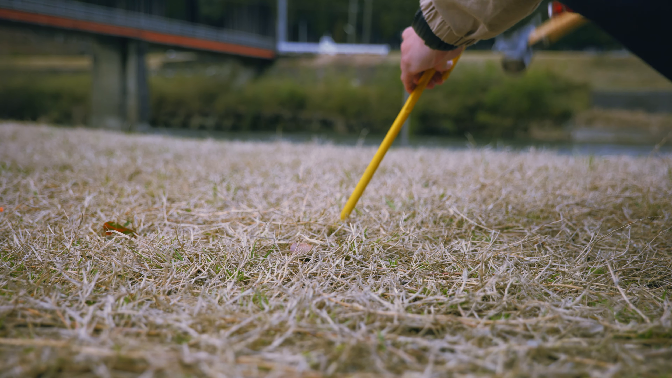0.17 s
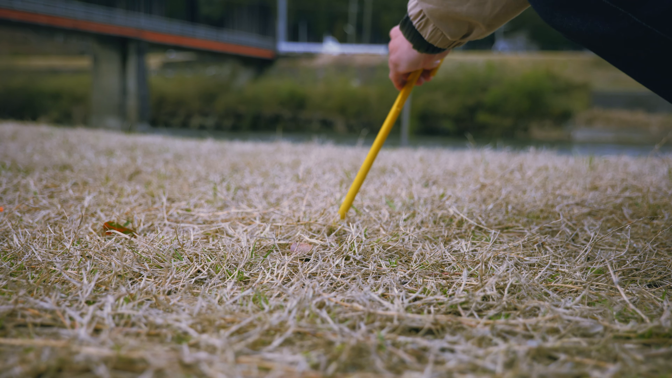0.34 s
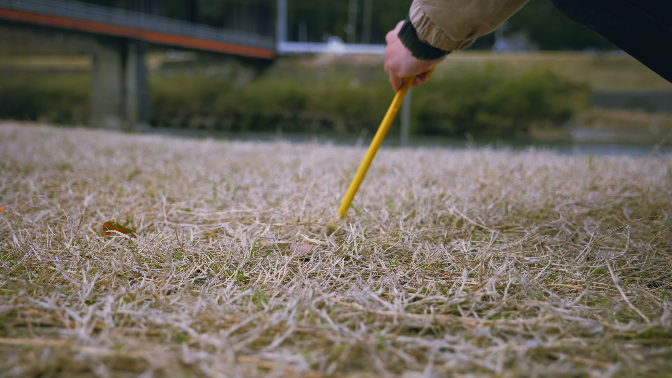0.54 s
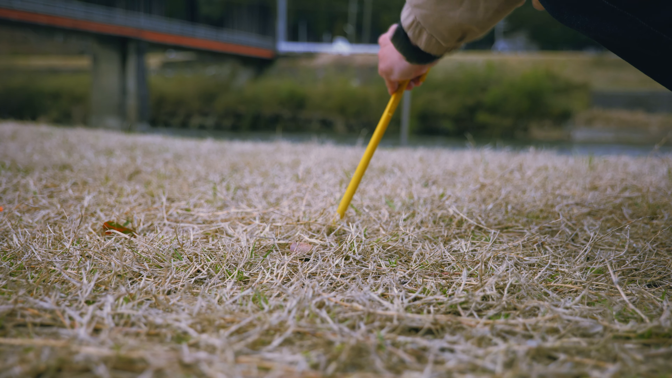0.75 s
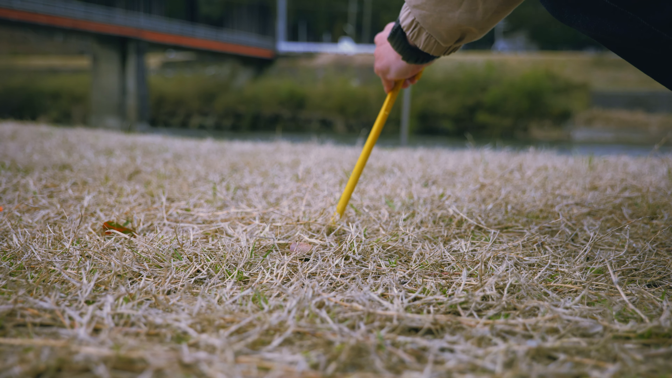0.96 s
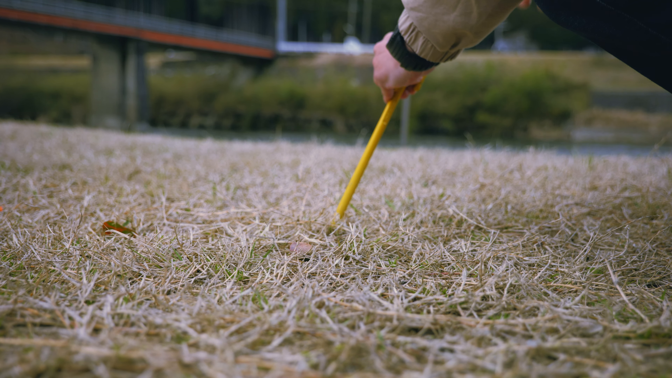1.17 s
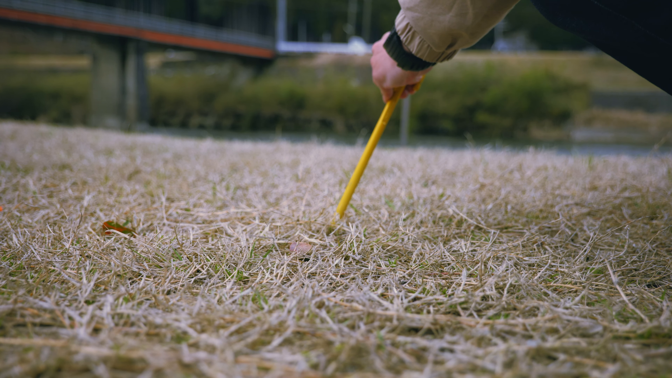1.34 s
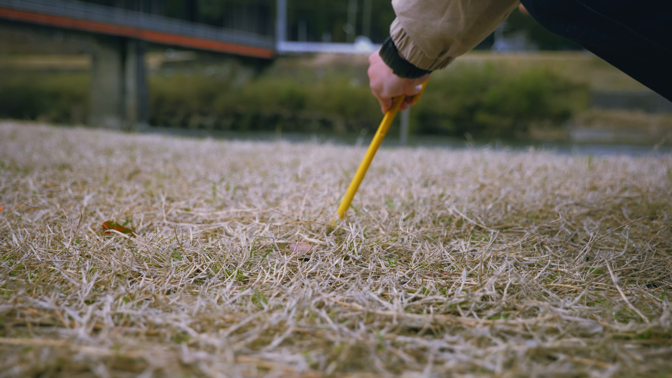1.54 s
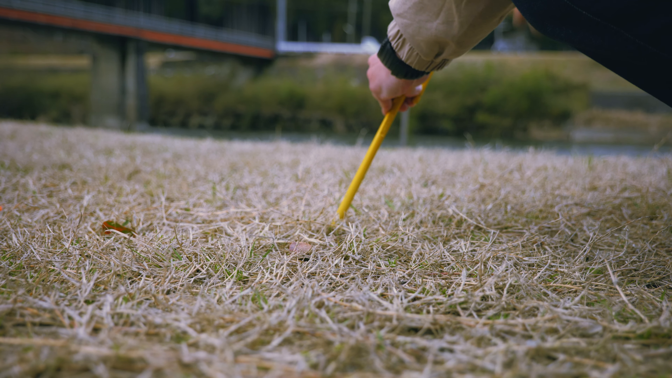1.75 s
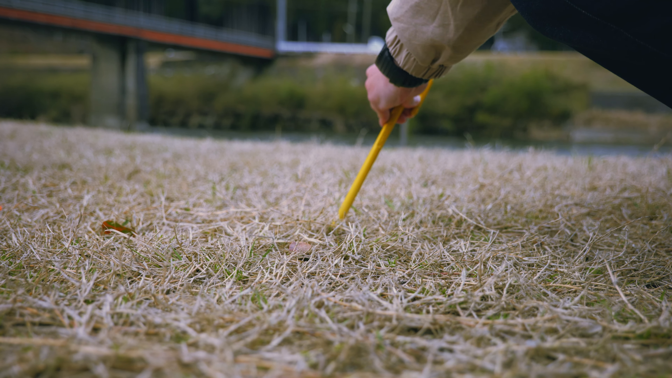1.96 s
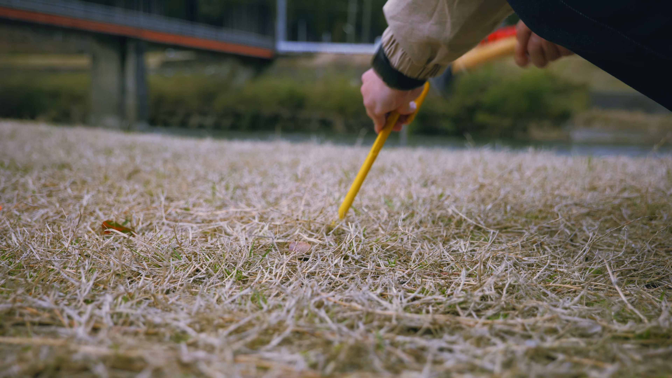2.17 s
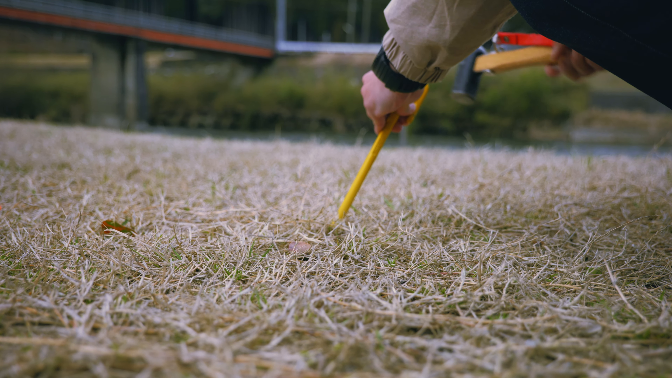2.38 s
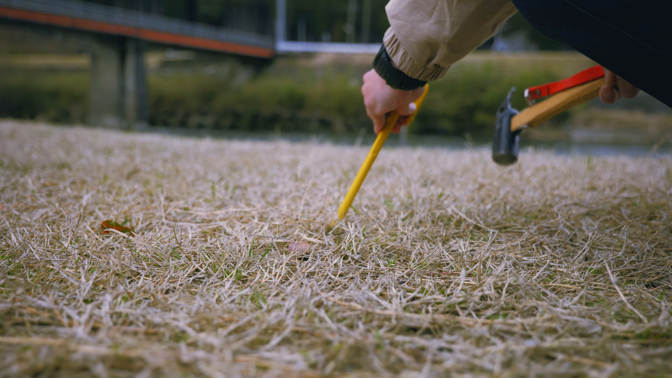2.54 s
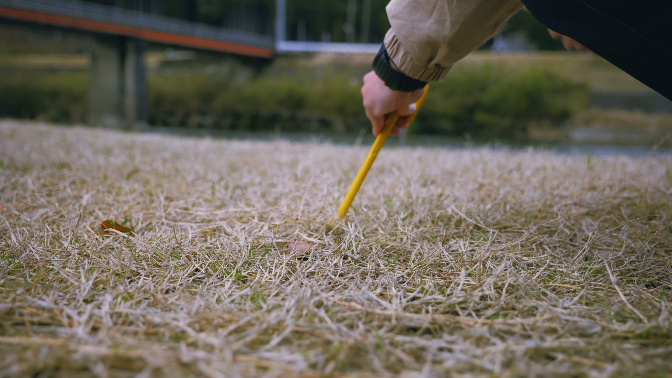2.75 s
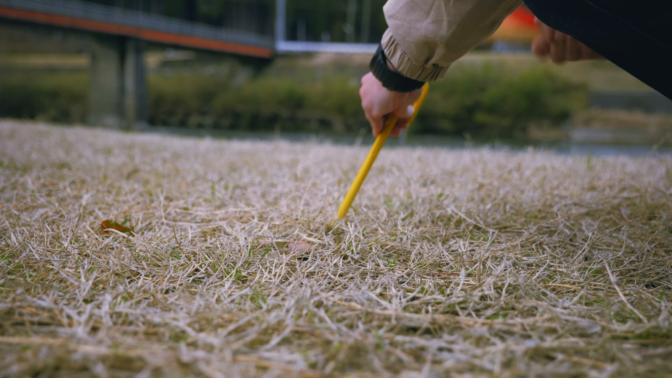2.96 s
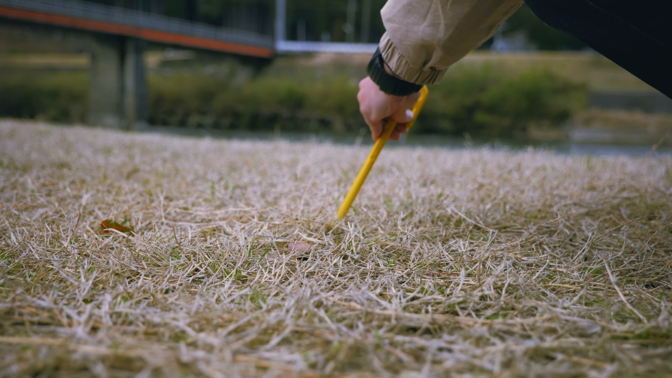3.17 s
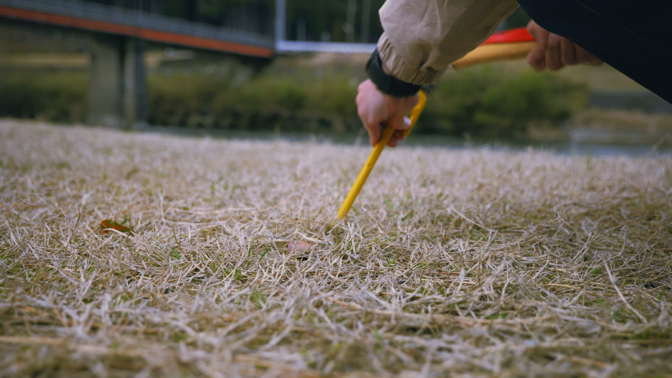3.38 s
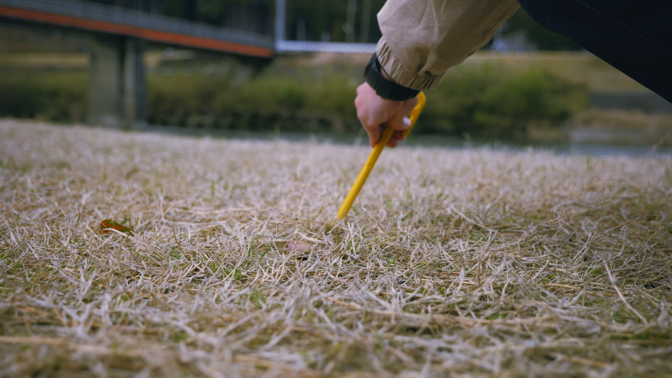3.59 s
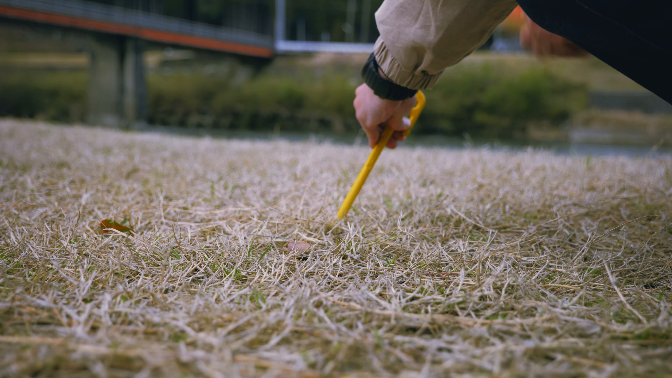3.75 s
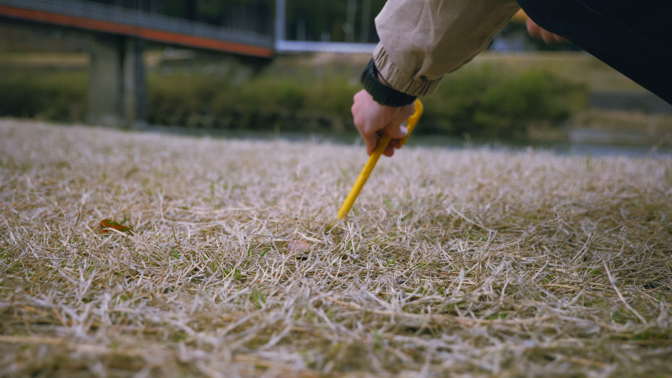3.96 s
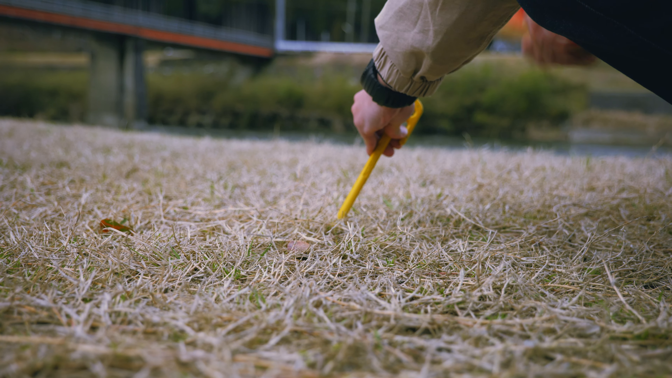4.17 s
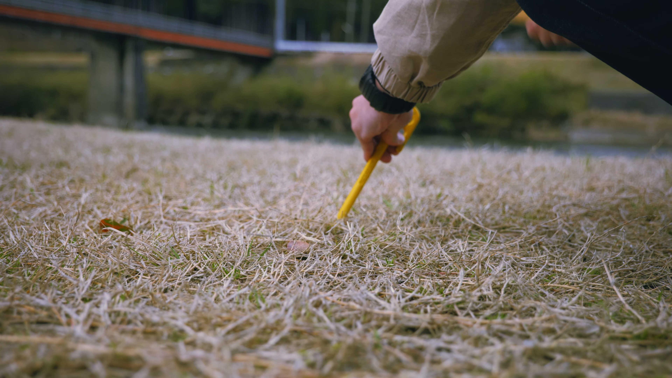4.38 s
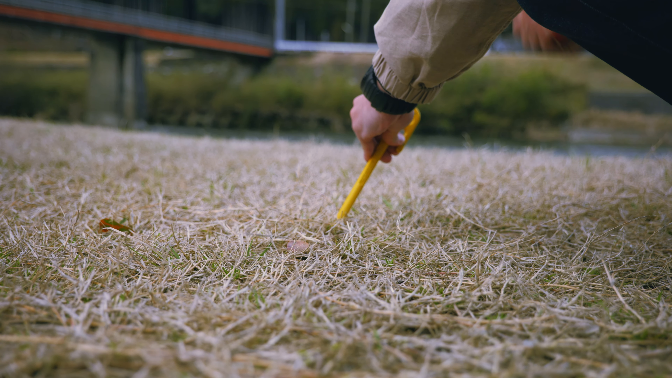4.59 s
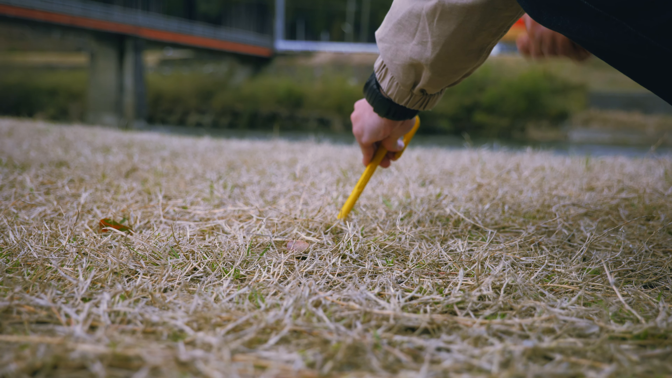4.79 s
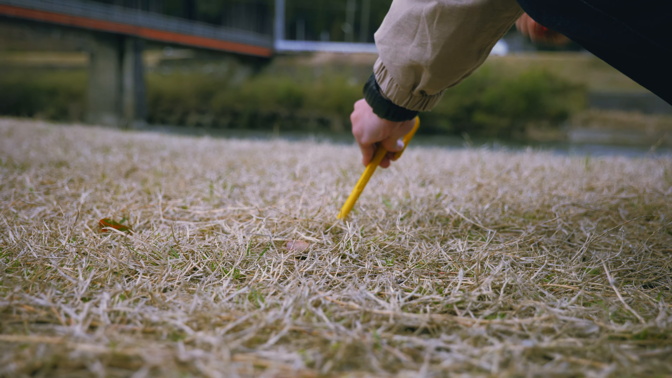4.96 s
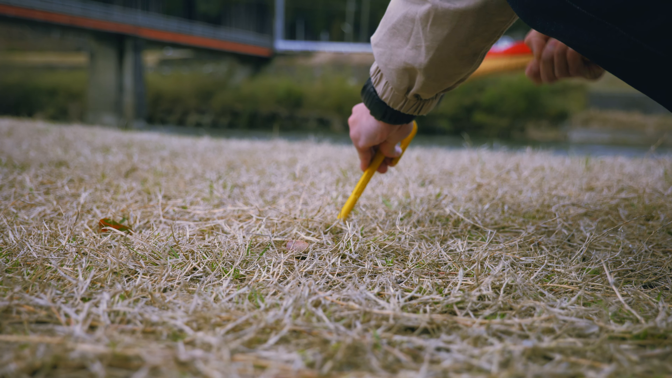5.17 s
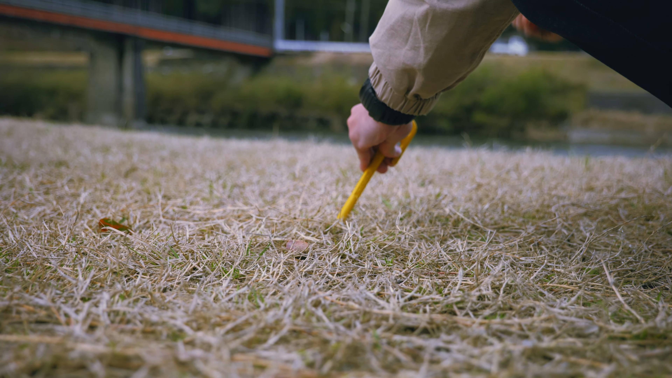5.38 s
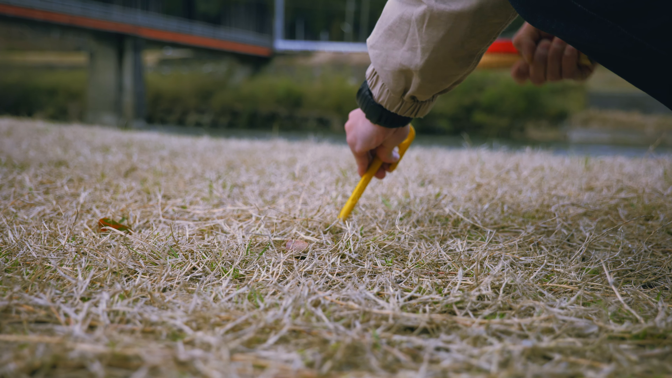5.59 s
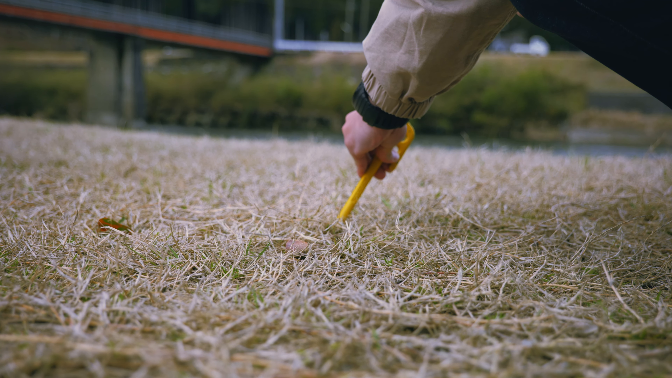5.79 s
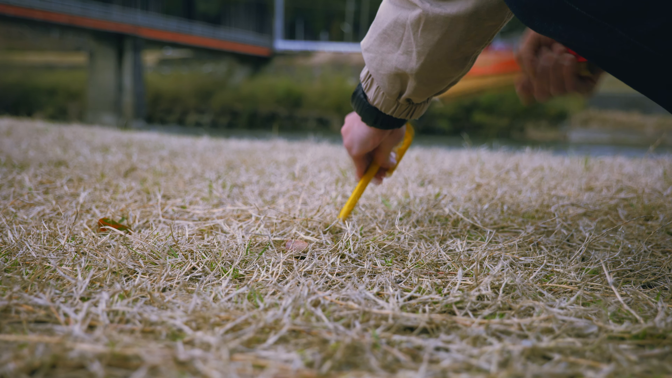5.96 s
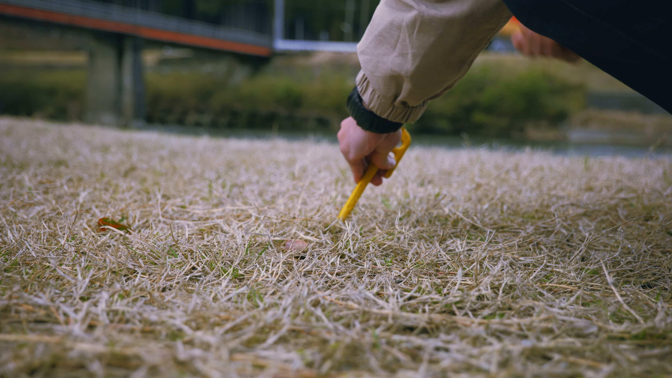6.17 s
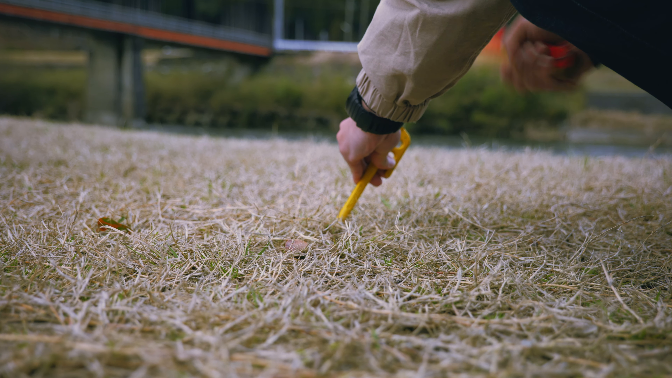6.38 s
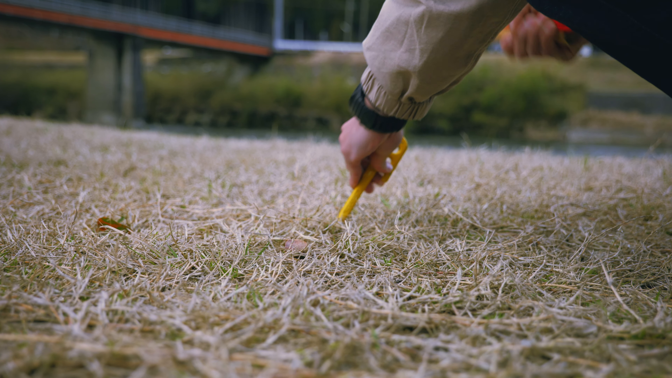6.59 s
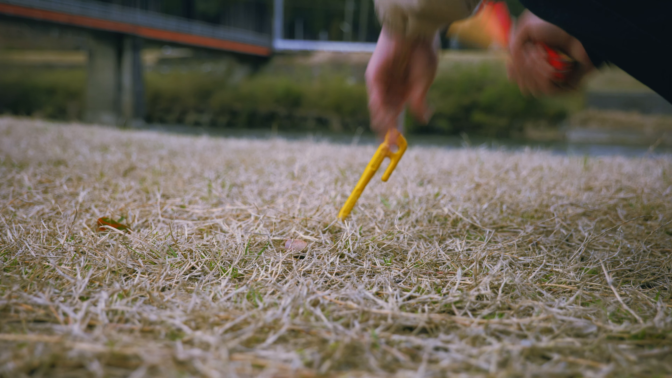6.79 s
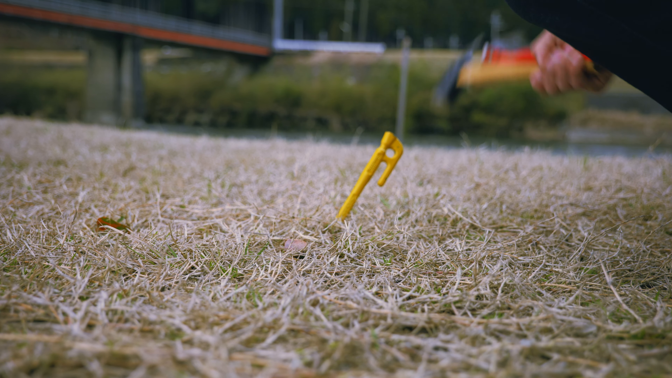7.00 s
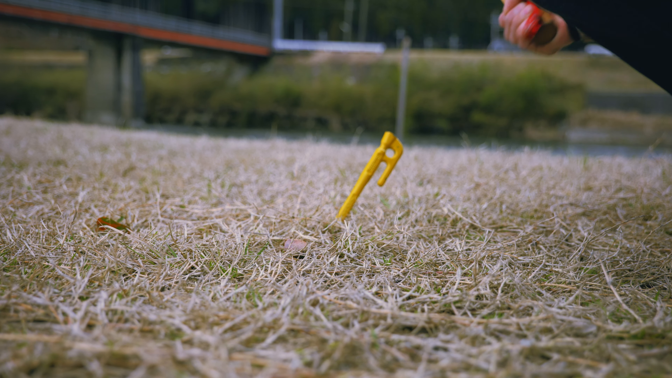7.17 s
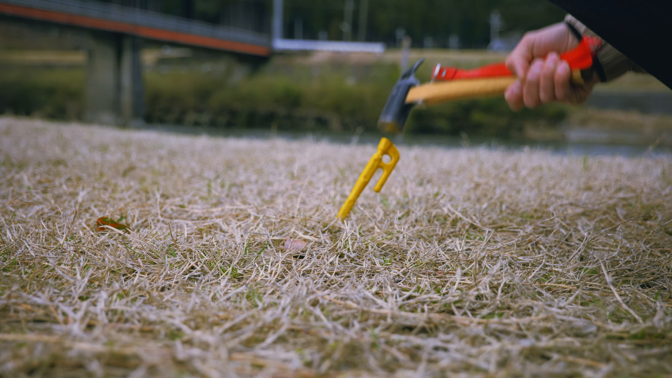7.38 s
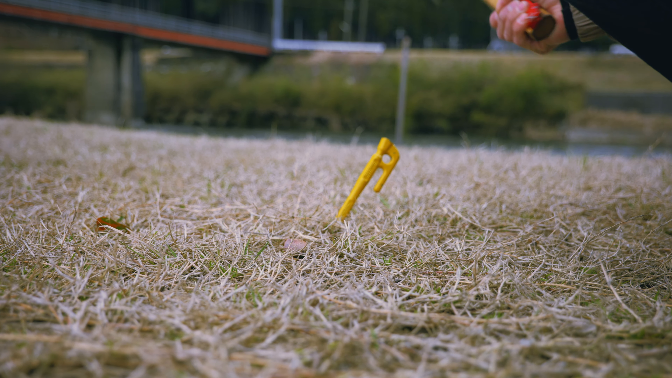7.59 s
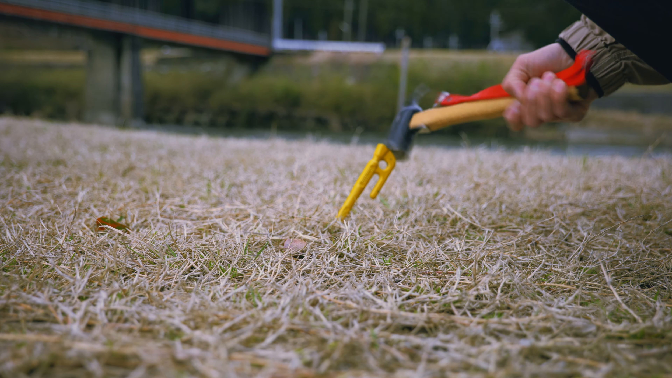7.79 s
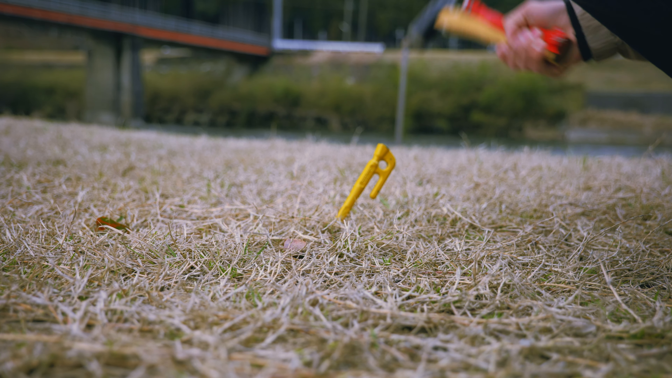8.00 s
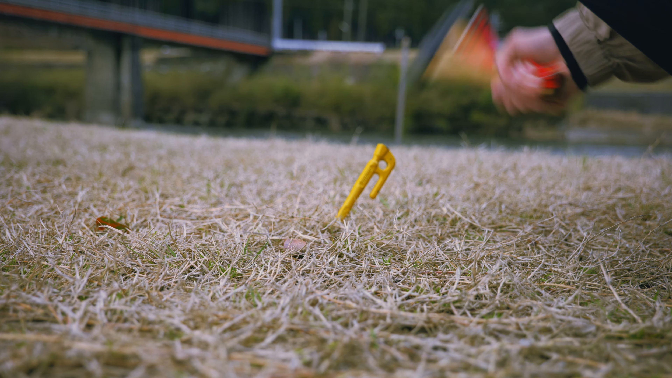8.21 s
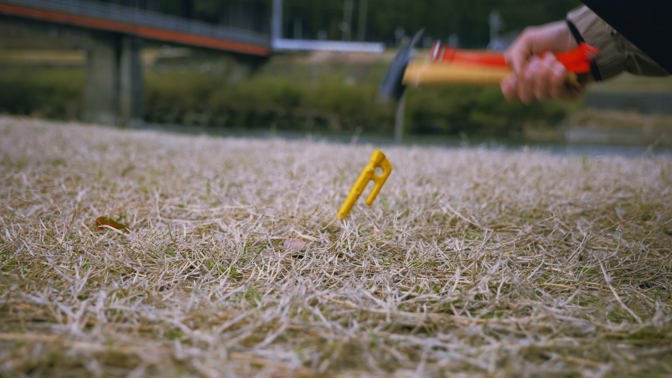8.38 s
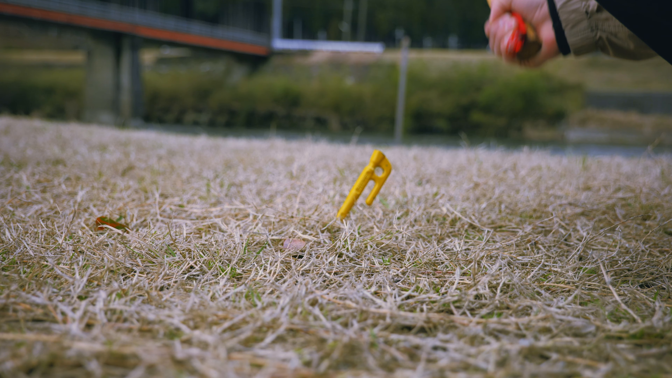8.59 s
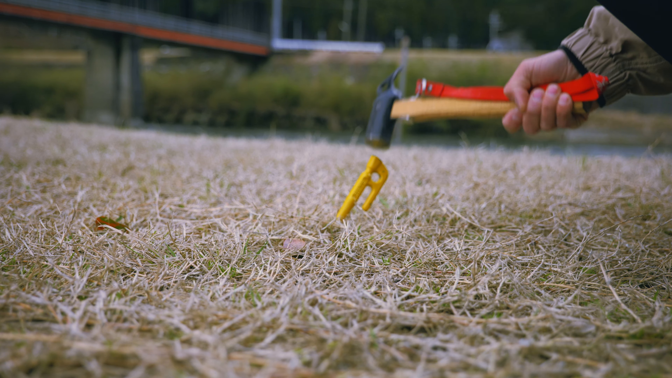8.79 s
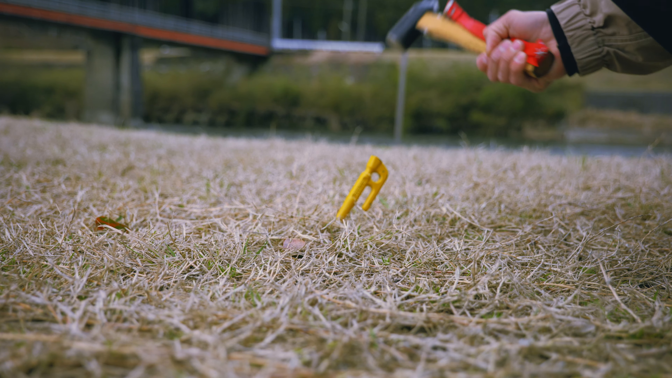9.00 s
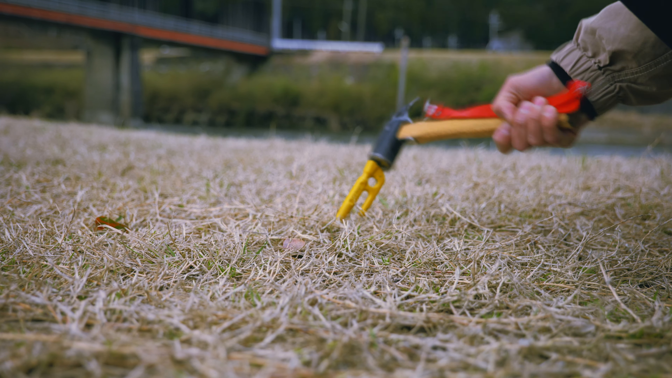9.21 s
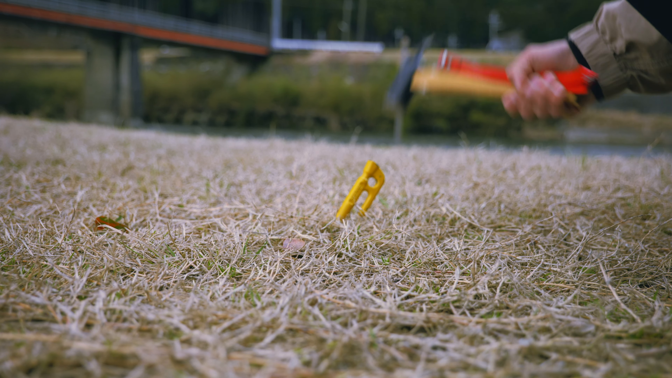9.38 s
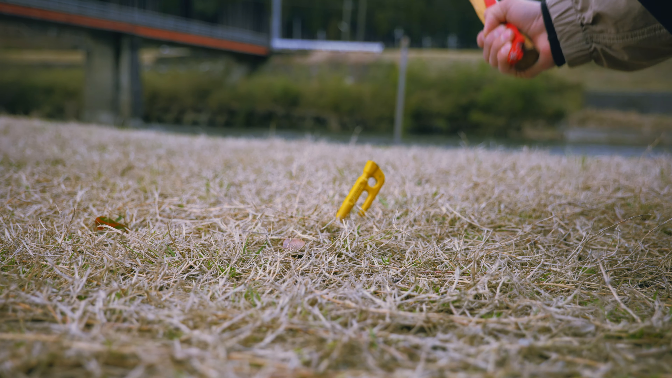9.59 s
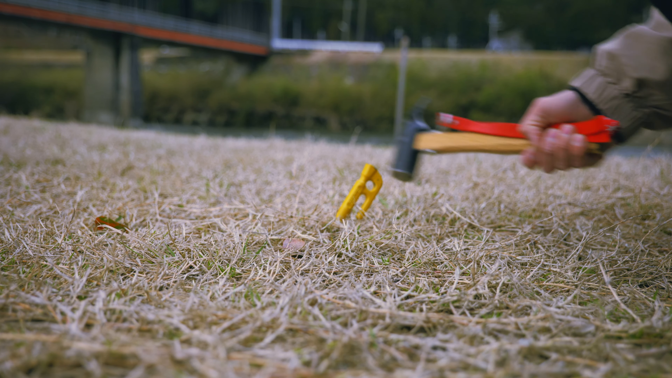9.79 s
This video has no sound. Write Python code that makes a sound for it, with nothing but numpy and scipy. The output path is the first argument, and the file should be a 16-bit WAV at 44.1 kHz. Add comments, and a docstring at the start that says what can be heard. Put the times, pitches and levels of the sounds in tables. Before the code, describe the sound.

Clothing rustles and a grip creaks briefly. Then a steel hammer drives a tent stake into a dry lawn, about two blows a second, with one short pause early on. Each blow is a sharp clack with a high, short ring and a dull knock of soil. The microphone is close and slightly overloaded by the hits, with faint wind, distant rumble and tiny grass snaps behind them.

```python
"""A grip creaks and clothing rustles, then a steel hammer drives a forged tent stake into a dry lawn, close up.
Each blow cracks, pings in the hammer head, bounces and leaves the stake ringing; far walls answer faintly.
The blows overload the recorder, whose limiter ducks the wind, rumble and hiss after each one.
The stake starts loose and soon seats. Later the steadying hand lets go with a swish, the main ring
tends to hang longer, and crumbs of soil drop back after the last, deep blows."""
import sys
import numpy as np
from scipy import signal
from scipy.fft import rfft, irfft, next_fast_len
from scipy.io import wavfile
from scipy.ndimage import map_coordinates

SR = 44100
rng = np.random.default_rng(int(sys.argv[2]) if len(sys.argv) > 2 else 0)


def generate_wav(sig):
    """Save sig (samples, or channels by samples) to the path in sys.argv[1] as 16-bit PCM at SR."""
    pcm = np.round(np.clip(np.atleast_2d(sig).T, -1, 1) * 32767).astype(np.int16)
    wavfile.write(sys.argv[1], SR, pcm)


N = 434385

# hammer blows: (time [s], clack [dB], soil knock [dB], main ring [dB], its t60 [s], high ring [dB])
BLOWS = [(0.7675, 15, -15, -14, 0.11, -39), (1.097, 13.5, -19.5, -4.5, 0.097, -13),
         (1.4445, 12, -13.5, -2, 0.13, -25.5), (1.815, 13.5, -3, -11, 0.12, -22),
         (2.189, 11.5, -3, -16.5, .13, -35), (3.0158, 11.5, -12, -20, .27, -23),
         (3.4104, 7.5, -2.5, -7, 0.11, -25), (3.827, 8, 0, -8, 0.097, -26),
         (4.2436, 8.5, -4.5, -16.5, 0.14, -28.5), (4.6913, 10.5, -13, -17.5, .08, -33.5),
         (5.1129, 11, -22, -17.5, 0.088, -25), (5.5464, 12.5, -23, -20, 0.13, -30),
         (6.0126, 10, -23, -17, 0.17, -55.5), (6.4504, 11.5, -24, -20, 0.11, -36.5),
         (6.8863, 8, -9, -14.5, .13, -32), (7.349, 11.5, -6.5, -16.5, .21, -20),
         (7.8233, 11.5, -5.5, -0.5, 0.13, -19.5), (8.2914, 12.5, 0, -14.5, .19, -27),
         (8.7628, 9.5, -6, -16.5, 0.23, -33.5), (9.2576, 9.5, -3, -7, 0.22, -32),
         (9.788, 8.5, -1, 4, 0.093, -23)]
# body of a small dry snap: (frequency [Hz], level [dB], t60 [s])
SNAP_MODES = [(1400, 7.5, 0.0036), (2908, 7.5, 0.0065), (4300, 0, 0.0015)]
# bright crunch of grit: (frequency [Hz], level [dB])
CRUNCH_SPECTRUM = [(200, -30), (900, -20.5), (1350, -20), (2200, -8), (3400, 2.5), (5000, -4), (7000, -6.5),
                   (9000, -17.5), (15000, -19.5)]
# hiss of dry grass and clothing: (frequency [Hz], level [dB])
HISS_SPECTRUM = [(200, -13), (700, -0.5), (1200, -2), (2000, -5), (3200, -9.5), (4500, -14.5),
                 (6000, -17.5), (8000, -28), (11000, -30.5), (15500, -29.5)]


def hammer():
    """Each blow clashes steel on steel, pushes the shaft into the soil and sets the stake ringing."""
    # the clack rises as the stake sinks and stiffens: (time [s], pitch [ratio])
    stiffening = [(.8, 0.73), (1.8, 0.82), (3, 0.9705), (9.8, 1.073)]
    bite_s, seated_s, seating_s, let_go_s = 1.3, 1.9, 0.15, 6.7
    out, t = np.zeros(N), np.arange(SR // 2) / SR
    for s, clack_db, knock_db, ring_db, ring_t60, high_db in BLOWS:
        loose = 1 / (1 + np.exp((s - seated_s) / seating_s))  # glides from 1 to 0 as the stake firms up
        held = s < let_go_s
        ping_db, hook_db, high_t60, slide_db = (2, -22, 0.2366, 0) if held else (-8, -16, 0.21, -3.5)
        stiffness = np.interp(s, *np.transpose(stiffening))
        steel = clash(t, stiffness, loose, clack_db, clack_db + ping_db, bounce_db=7.3 + 0.23 * knock_db)
        scrape_db = -5.5 + 0.9 * knock_db + 20 * loose
        thud_db = -12.5 + 0.35 * knock_db + 0.6 * loose - 6.5 * (s < bite_s)  # softer until the tip bites
        earth = soil(t, knock_db, scrape_db, thud_db, slide_db)
        bend_db = -10 + 0.55 * knock_db - 3.5 * loose - 5 * s  # the buried shaft bends ever less
        tone = stake(t, ring_db, ring_t60, high_db, high_t60, bend_db, hook_db)
        add(out, s, steel + earth + tone)
    return highpass(out, 130)


def clash(t, stiffness, loose, clack_db, head_db, bounce_db):
    """The stake springs back against the hammer in four shrinking hops; the resting hammer chokes them."""
    out = strike(t, stiffness, clack_db, head_db)
    first_flight_s, hop_shrink = 0.005 + 0.003 * loose, 0.64
    loss_db = 10.5 * (1 - loose) + 1.5 * loose  # per bounce: a loose stake rattles on
    landings = np.cumsum(first_flight_s * hop_shrink ** np.arange(4))
    for k, s in enumerate(landings):
        add(out, s, strike(t, stiffness, bounce_db - loss_db * k, head_db - 9.5 - 10.5 * k))
    return out * fade(np.maximum(t - landings[1], 0), 8 * first_flight_s)


def strike(t, stiffness, clack_db, head_db):
    """One steel contact: a rough clack and the ping of the hammer head."""
    # short-lived contact modes at stiffness 1: (frequency [Hz], level [dB], t60 [s])
    contact_modes = [(1836, -14.5, 0.0057), (2340, -1.5, 0.0051), (2830, -3.5, 0.0059),
                     (3233, -3.5, 0.0065), (4480, -18, 0.01)]
    # ping of the hammer head: (frequency [Hz], level [dB], t60 [s])
    head_modes = [(5780, -6.5, 0.022), (5896, -3, .018), (6610, -19, 0.013), (7330, -16, 0.017)]
    grit = amp(-16) * noise(CRUNCH_SPECTRUM, len(t)) * fade(t, 0.01)
    clack = ring(t * stiffness, contact_modes, detune=0.014, scatter_db=1.5) + grit
    ping = ring(t, head_modes, detune=0.013, scatter_db=3)
    return amp(clack_db) * clack + amp(head_db) * ping


def stake(t, ring_db, ring_t60, high_db, high_t60, bend_db, hook_db):
    """The stake rings, damped by hand and soil: main tone, beating high pair, bending shaft and hook."""
    # weak, quickly damped modes of the hook: (frequency [Hz], level [dB], t60 [s])
    hook_modes = [(2170, -2.5, 0.0049), (3100, 0, 0.037), (5190, -2.5, 0.056), (8670, -9, 0.031),
                  (13100, -16, .03)]
    bend_hz, main_hz, high_hz = 1500, 4160 + rng.normal(0, 9), 10255
    beat_hz = rng.uniform(8, 18)
    main = amp(ring_db) * mode(t, main_hz, ring_t60)
    shimmer = amp(high_db) * (mode(t, high_hz, high_t60) + amp(-7) * mode(t, high_hz + beat_hz, high_t60))
    bend = amp(bend_db) * mode(t, bend_hz, t60=0.14)
    hook = amp(hook_db + 0.15 * ring_db) * ring(t, hook_modes, detune=0.0091, scatter_db=1.5)
    return main + shimmer + bend + hook


def soil(t, knock_db, scrape_db, thud_db, slide_db):
    """The soil knocks as it yields, the shaft slides through grit, and the turf thumps a moment later."""
    # knock of the yielding soil: (frequency [Hz], level [dB], t60 [s])
    knock_modes = [(755.3, -1.5, 0.0055), (1096, 6, 0.0037)]
    # dull thud of earth around the shaft: (frequency [Hz], level [dB])
    thud_spectrum = [(40, -16), (110, 0), (200, 4), (300, -6), (500, -6.5), (850, -3), (1300, -14),
                     (3000, -12.5), (6000, -31), (12000, -51.5)]
    # turf giving way under the stake: (frequency [Hz], level [dB], t60 [s])
    turf_modes = [(220, -6, 0.036), (276, -4.5, 0.012), (635, -12, 0.019), (805, -3.5, 0.0093),
                  (980, -12, 0.028)]
    knock = amp(knock_db) * ring(t, knock_modes, detune=0.088, scatter_db=1)
    scrape = amp(scrape_db + slide_db) * gritty(len(t), depth_db=5.5, grain_hz=700) * fade(t, 0.05)
    thud_envelope = fade(t, 0.065) * (1 - fade(t, 0.023))
    thud = amp(thud_db + slide_db) * noise(thud_spectrum, len(t)) * thud_envelope
    out = knock + scrape + thud
    add(out, 0.003, amp(thud_db + 13) * ring(t, turf_modes, detune=0.044, scatter_db=0.5))
    return out


def gritty(size, depth_db, grain_hz):
    """Noise that comes in tiny grains, like steel dragged through sand."""
    grains = np.interp(np.arange(size) * grain_hz / SR, np.arange(size), rng.standard_normal(size))
    return unit(noise(CRUNCH_SPECTRUM, size) * amp(depth_db * grains))


def echoes(blows):
    """The bright part of each blow slaps back from far walls over a faint, long wash."""
    # echo send, weaker once the stake sinks into the grass: (time [s], level [dB])
    send = [(.8, 1.5), (3, 1.5), (6.4, -8.5), (9.8, -4)]
    # slaps from the far walls: (delay [s], level [dB])
    walls = [(0.033, -37.5), (0.067, -52.5), (.128, -62.5), (.245, -63.5)]
    t = np.arange(SR * 3 // 2) / SR
    response = amp(-57.5) * unit(rng.standard_normal(len(t)) * fade(t, 1.9)) / np.sqrt(len(t))
    for delay, db in walls:
        response[round(delay * SR)] += amp(db)
    bright = highpass(blows * amp(curve(send)), 3800)
    return signal.fftconvolve(bright, response)[:N]


def creak():
    """The grip sticks and slips, sagging in pitch from slip to slip."""
    # slips of the grip: (time [s], level [dB])
    slips = [(0.136, -16), (.167, -10), (0.1963, -4), (.2174, -6), (0.233, -0.5), (0.2496, -10),
             (0.264, -4), (.279, -4.5), (0.292, -2), (.307, -3), (0.3274, -1.5), (0.3542, -2)]
    # body of a slip: (frequency [multiple of its pitch], level [dB], t60 [cycles])
    grip_modes = [(.62, -7, 4), (1, 0, 4.5), (1.7, -6, 5)]
    # raspy edge of a slip: (frequency [Hz], level [dB], t60 [s])
    rasp_modes = [(2350, -34, 0.0033), (3100, 2, 0.005)]
    start_hz, sag_hz_per_s = 1298, 3760
    out, t = np.zeros(N), np.arange(SR // 40) / SR
    for s, db in slips:
        hz = start_hz - sag_hz_per_s * (s - slips[0][0])
        modes = [(hz * ratio, level, cycles / hz) for ratio, level, cycles in grip_modes]
        body = ring(t, modes, detune=0.04, scatter_db=1)
        rasp = amp(-12) * ring(t, rasp_modes, detune=0.05, scatter_db=2)
        scrape = amp(-18.5) * noise(HISS_SPECTRUM, len(t)) * fade(t, 0.022)
        add(out, s, amp(db) * (body + rasp + scrape))
    return highpass(out, 140)


def ticks():
    """Dry stalks and cloth snap softly; a crumb of soil drops back after each of the last blows."""
    # the louder snaps of grass and cloth: (time [s], level [dB])
    snaps = [(0.481, -22.5), (1.725, -29), (2.009, -27.5), (2.9307, -21.5), (3.5278, -29.5),
             (3.7347, -31.5), (4.133, -26.5), (4.417, -32.5), (5.373, -32.5), (5.682, -28), (6.6397, -30),
             (6.773, -33), (7.1368, -27.5), (7.1761, -26.5), (8.659, -31.5), (9.5323, -31.5)]
    crumbs_from_s, fall_s, crumb_db = 8, 0.043, -21.5
    crumbs = [(s + fall_s, crumb_db) for s, *_ in BLOWS if s > crumbs_from_s]
    out, t = np.zeros(N), np.arange(SR // 40) / SR
    for s, db in snaps + crumbs:
        click = amp(-12) * noise(CRUNCH_SPECTRUM, len(t)) * fade(t, 0.006)
        body = amp(-13.5) * ring(t, SNAP_MODES, detune=0.12, scatter_db=2.5)
        add(out, s, amp(db) * (click + body))
    return out


def crackle():
    """Dry grass under shifting feet gives tiny random snaps in six timbres."""
    # stirring of the grass: (time [s], density [snaps/s])
    stir = [(0, 25), (3, 6), (6.6, 4), (7.05, 20), (7.2, 70), (7.5, 4), (8.3, 5), (8.6, 18), (9.8, 27)]
    triggers = rng.random(N) < curve(stir) / SR
    snaps = triggers * amp(-53.5 + 2 * np.minimum(rng.exponential(size=N), 3))
    t = np.arange(SR // 50) / SR
    timbre = rng.integers(0, 6, N)
    bodies = [ring(t, SNAP_MODES, detune=0.069, scatter_db=4.5) for _ in range(6)]
    return sum(signal.fftconvolve(snaps * (timbre == k), body)[:N] for k, body in enumerate(bodies))


def sleeve():
    """Hand and sleeve brush the grass in one smooth swish as they leave the stake."""
    # envelope of the swish: (time [s], level [dB])
    swish = [(6.7, -63.5), (6.8, -51.5), (6.971, -50), (7.1, -50.5), (7.2, -59), (7.3, -67)]
    # cloth on grass: (frequency [Hz], level [dB])
    cloth_spectrum = [(300, -11.5), (900, -8), (1350, 0.5), (1900, -9.5), (3000, -6.5), (5000, -12),
                      (8000, -26.5), (15000, -32.5)]
    level_db = np.interp(np.arange(N) / SR, *np.transpose(swish), left=-120, right=-120)
    return amp(level_db + 0.8 * wobble(37)) * noise(cloth_spectrum, N)


def outdoors():
    """The ambience bed: wind on the microphone, a distant rumble and the hiss of grass and clothing."""
    # gusts on the microphone: (time [s], half length [s], level [dB])
    gusts = [(0.174, 0.65, -56.5), (1.351, 0.16, -59), (2.604, 0.25, -59), (4.997, 0.26, -49.5),
             (6.304, 0.27, -72.5)]
    # low buffeting of the wind: (frequency [Hz], level [dB])
    wind_spectrum = [(18, -14), (35, -2), (55, -5.5), (90, -4.5), (160, -14.5), (400, -45), (1500, -100)]
    # distant rumble: (frequency [Hz], level [dB])
    rumble_spectrum = [(40, -27), (120, -9.5), (200, -0.5), (320, 2), (500, 0), (750, -8), (1200, -19),
                       (3000, -44), (9000, -88)]
    # envelope of the rumble, which the hiss follows: (time [s], level [dB])
    bed_envelope = [(0, -37), (1.4, -40), (2.2, -47.5), (2.85, -44.5), (3.5, -48.5), (4.5, -50),
                    (5.5, -52.5), (7.8, -55.5), (9.8, -52.5)]
    bed_db = curve(bed_envelope)
    breeze = amp(-62.5) + sum(swell(*gust) for gust in gusts)
    wind = breeze * amp(1.5 * wobble(54)) * noise(wind_spectrum, N)
    rumble = amp(bed_db + 0.34 * wobble(2.1)) * noise(rumble_spectrum, N)
    rustle = swell(0.3, half_length=0.29, db=-35)  # clothing, as the grip is taken
    flutter = amp(0.27 * wobble(7.2) + 0.37 * wobble(360))
    hiss = np.hypot(amp(bed_db - 6), rustle) * flutter * noise(HISS_SPECTRUM, N)
    return wind + rumble + hiss


def amp(db):
    """Decibels to gain."""
    return 10 ** (np.asarray(db) / 20)


def unit(x):
    """x at rms 1."""
    return x / np.sqrt(np.mean(x ** 2) + 1e-20)


def add(track, s, sound):
    """Mix a sound into a track at s seconds."""
    part = track[max(0, round(s * SR)):][:len(sound)]
    part += sound[:len(part)]


def curve(rows):
    """(time [s], value) breakpoints joined into one value per sample."""
    return np.interp(np.arange(N) / SR, *np.transpose(rows))


def swell(s, half_length, db):
    """A bell-shaped rise and fall of gain around s seconds."""
    return amp(db) * np.exp(-((np.arange(N) / SR - s) / half_length) ** 2)


def wobble(rate):
    """A smooth random curve, rate knots a second."""
    return map_coordinates(rng.standard_normal(int(N * rate / SR) + 4), [np.arange(N) * rate / SR])


def fade(t, t60):
    """Exponential decay, 60 dB down at t60."""
    return np.exp(-np.log(1000) * t / t60)


def mode(t, hz, t60):
    """One damped vibration."""
    return np.sin(2 * np.pi * hz * t) * fade(t, t60)


def ring(t, modes, detune, scatter_db):
    """Modes struck at slightly new strengths and pitches; neighbours swing in opposite directions."""
    luck = rng.standard_normal((len(modes), 2))
    return sum((-1) ** k * amp(db + scatter_db * luck[k, 0]) * mode(t, hz * (1 + detune * luck[k, 1]), t60)
               for k, (hz, db, t60) in enumerate(modes))


def noise(spectrum, size):
    """Noise of rms 1 coloured by (frequency [Hz], level [dB]) points."""
    padded = next_fast_len(size)
    hz, db = np.transpose(spectrum)
    colour = amp(np.interp(np.log(np.fft.rfftfreq(padded, 1 / SR) + 1), np.log(hz), db))
    return unit(irfft(rfft(rng.standard_normal(padded)) * colour, padded)[:size])


def highpass(x, hz):
    """A second-order bass cut."""
    return signal.sosfilt(signal.butter(2, hz, "high", fs=SR, output="sos"), x)


def limiter(x, threshold_db, depth_db, attack_s, release_db_per_s):
    """Gain ducks within milliseconds of an overload and climbs back steadily."""
    over_db = np.clip(20 * np.log10(np.abs(x) + 1e-9) - threshold_db, 0, depth_db)
    climb_db = release_db_per_s * np.arange(N) / SR
    cut_db = np.maximum.accumulate(over_db + climb_db, axis=-1) - climb_db
    pole = np.exp(-1 / (attack_s * SR))
    return x * amp(-signal.lfilter([1 - pole], [1, -pole], cut_db))


def scene():
    """The mono mix at the microphone: blows and echoes, handling sounds, ambience."""
    blows = hammer()
    return (blows + echoes(blows) + creak() + ticks() + crackle() + sleeve() + outdoors())[None]


def record(dry):
    """The first cycles of a blow outrun the limiter and clip; the recorder trims lows and highs."""
    limited = limiter(dry, threshold_db=-0.5, depth_db=16.5, attack_s=0.0025, release_db_per_s=62)
    clipped = np.clip(limited, -1, 1)
    treble_cut = signal.firwin(201, 15900, fs=SR)[None]
    return signal.fftconvolve(highpass(clipped, 42), treble_cut, "same")


dry = scene()
out = record(dry)
generate_wav(out)
```